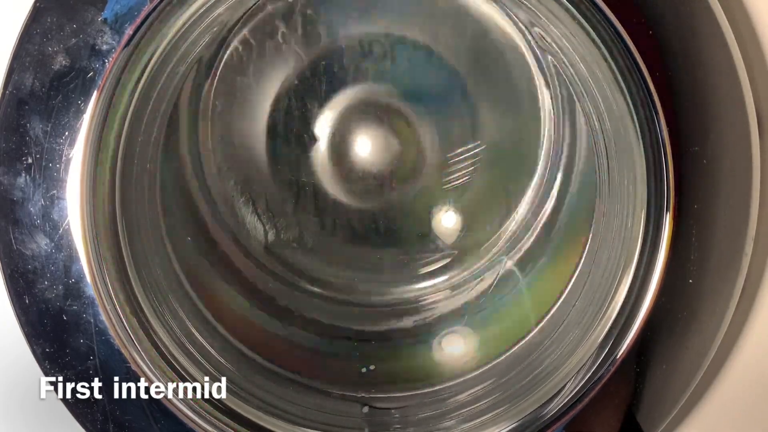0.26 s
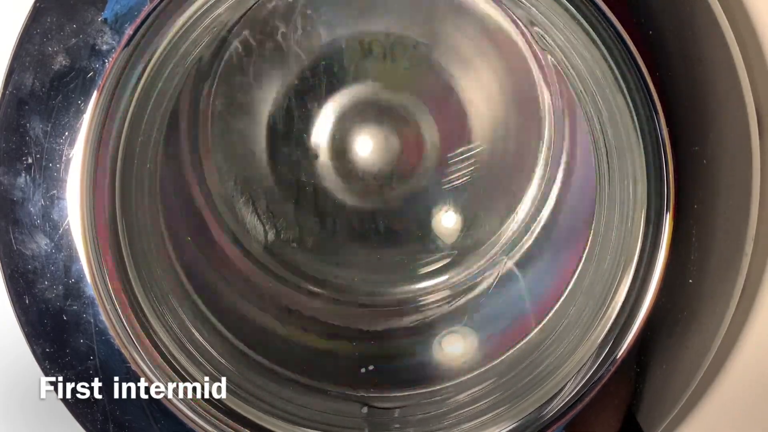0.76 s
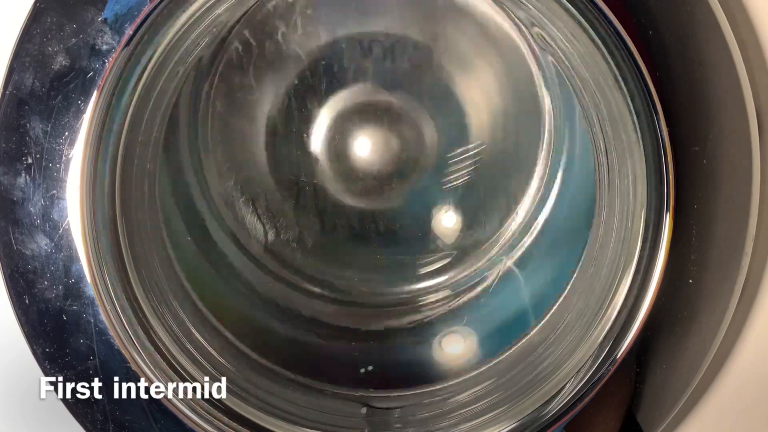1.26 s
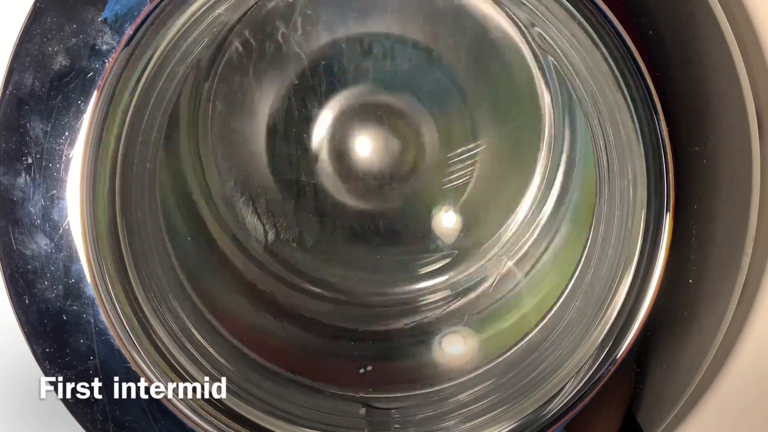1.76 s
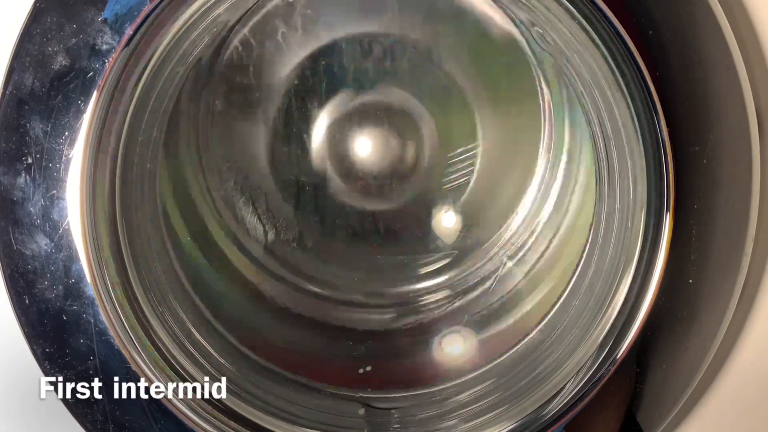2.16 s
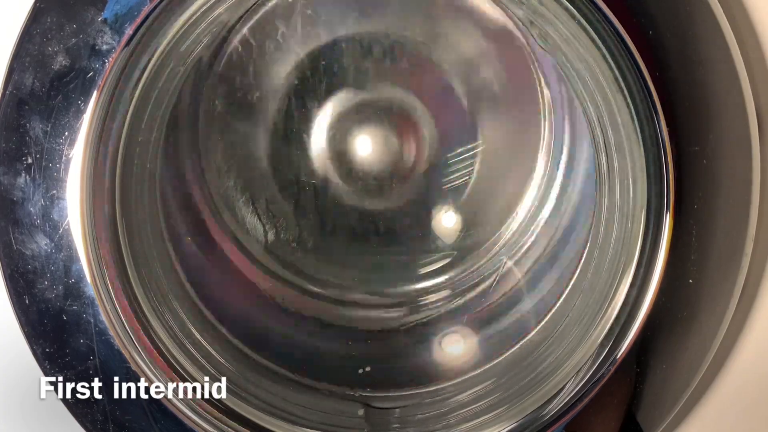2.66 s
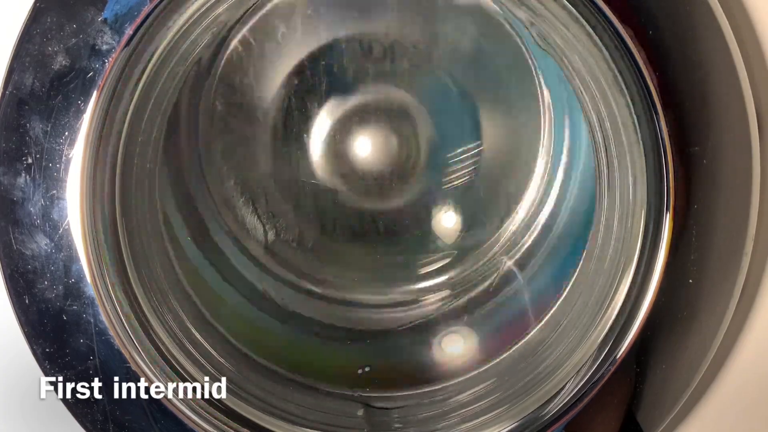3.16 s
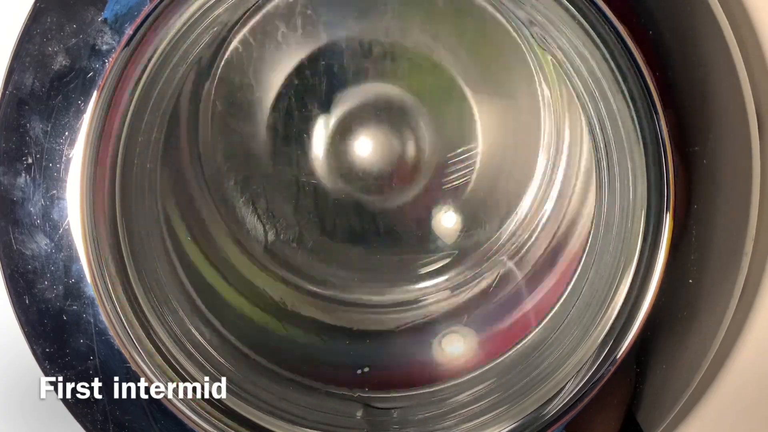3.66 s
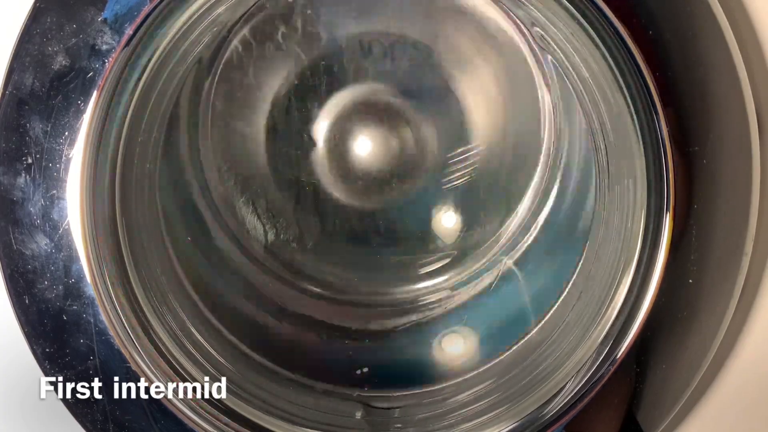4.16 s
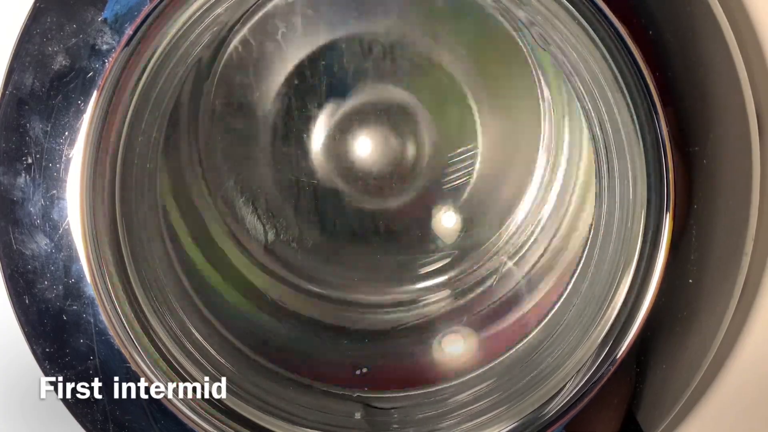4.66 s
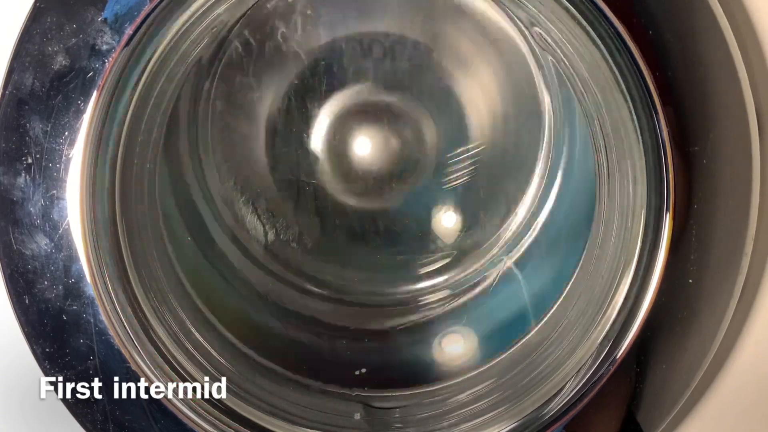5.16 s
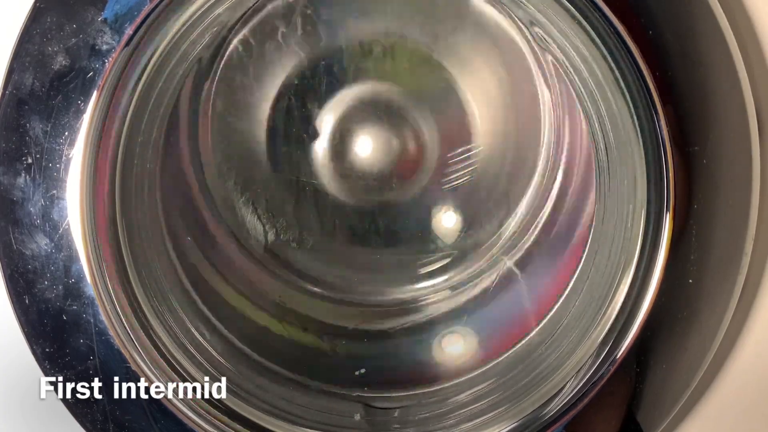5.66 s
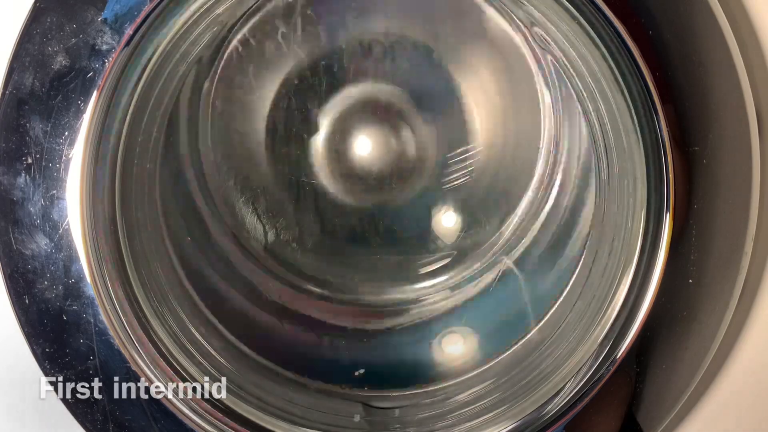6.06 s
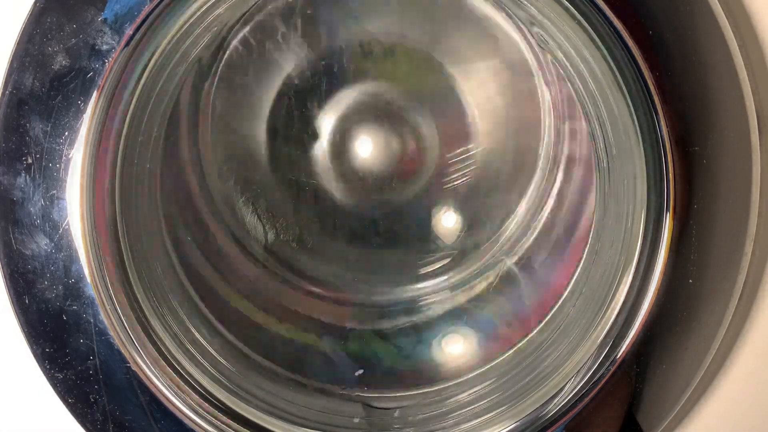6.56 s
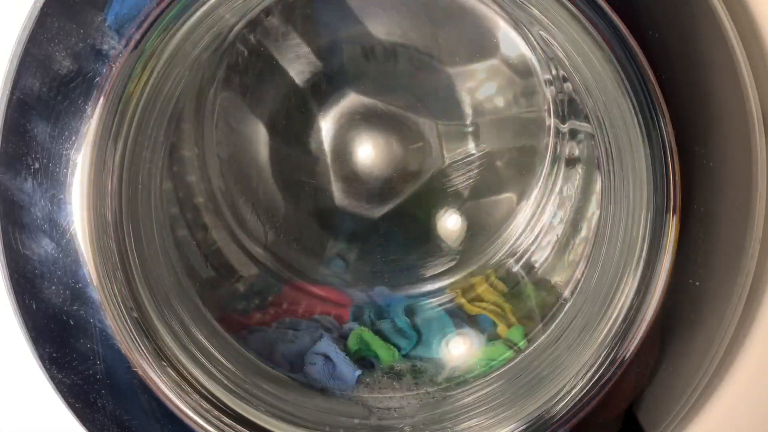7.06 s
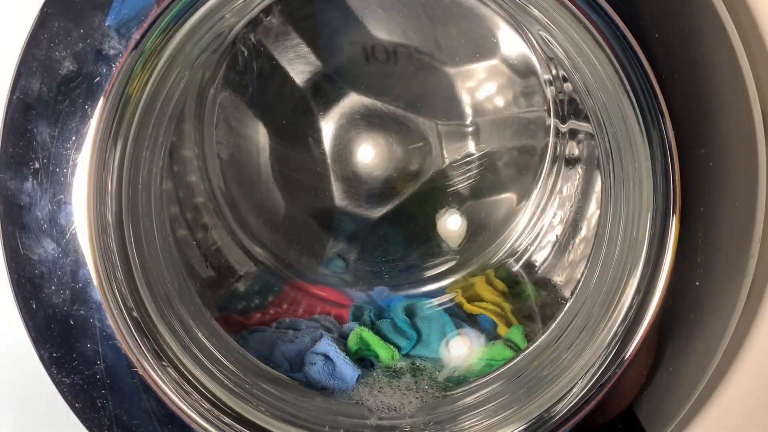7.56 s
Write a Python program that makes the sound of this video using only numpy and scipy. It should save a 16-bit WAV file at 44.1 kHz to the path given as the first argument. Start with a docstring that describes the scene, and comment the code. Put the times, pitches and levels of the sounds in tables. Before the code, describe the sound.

A front-loading washing machine spins, heard from close by. Its motor gives a steady low drone with gently beating tones, a rush of air and steel, and a thin high whine, slowing very slightly as it runs. Near the end the spin fades over about a second into the quiet hum of the standing machine, with a few faint high blips and a tiny puff of hiss.

```python
"""A close, droning rush with a high whine: a front-loading washing machine spins, slowing a little.
A brush motor drives the drum by a belt; shaft, drum, belt and mains tones beat as they cross.
The commutator whines in the casing; air and steel rush underneath. The spin fades into the quiet
hum of the standing machine. Faint blips of a 3.1 kHz tone and a puff of hiss are heard at the end."""
import sys
import numpy as np
from scipy import signal
from scipy.fft import rfft, irfft, next_fast_len
from scipy.io import wavfile
from scipy.ndimage import uniform_filter1d, map_coordinates

SR = 44100
rng = np.random.default_rng(int(sys.argv[2]) if len(sys.argv) > 2 else 0)


def wav_out(sig):
    """Save sig, one row per channel (or a flat mono array), as 16-bit PCM at SR to the path in sys.argv[1]."""
    wavfile.write(sys.argv[1], SR, np.round(np.clip(np.atleast_2d(sig).T, -1, 1) * 32767).astype(np.int16))


N = 343980
TIME_S = np.arange(N) / SR
GRID_POINTS = 1500


def amp(db):
    return np.exp(np.asarray(db) * (np.log(10) / 20))


def unit(x):
    return x / np.sqrt(np.mean(x ** 2) + 1e-20)


def curve(rows):
    """Per-sample values from (time_s, value) rows."""
    return np.interp(TIME_S, *np.transpose(rows))


def stretch(values):
    """Linear interpolation to N samples."""
    return np.interp(np.arange(N), np.linspace(0, N, len(values)), values)


def drift(rate_hz):
    """Smooth random curve on the coarse grid."""
    span = N * rate_hz / SR
    return map_coordinates(rng.standard_normal(int(span) + 4), [np.linspace(0, span, GRID_POINTS)])


def wobble(rate_hz):
    return stretch(drift(rate_hz))


def filtered(x, response):
    size = next_fast_len(N + SR // 2)
    return irfft(rfft(x, size) * response(np.fft.rfftfreq(size, 1 / SR)), size)[:N]


def resonance(hz, centre_hz, width_hz):
    """One mode, gain 1 at its centre."""
    return 1j * hz * width_hz / (centre_hz ** 2 - hz * hz + 1j * hz * width_hz)


def noise(spectrum, patchy_db):
    """Coloured noise, rms 1, with gain patches in time and frequency."""
    bins = signal.stft(rng.standard_normal(N), nperseg=512)[2]
    patches = uniform_filter1d(rng.standard_normal(bins.shape), size=6, axis=0)
    patches = uniform_filter1d(patches, size=14, axis=1)
    white = signal.istft(bins * amp(patchy_db * unit(patches)), nperseg=512)[1][:N]
    freq_hz, db = np.transpose(spectrum)
    colour = lambda hz: amp(np.interp(np.log(hz + 1), np.log(freq_hz + 1), db, left=-120, right=-120))
    return unit(filtered(white, colour))


def tone(turns, rms_db=0):
    """Sine, one cycle per turn, random phase."""
    return np.sqrt(2) * amp(rms_db) * np.sin(2 * np.pi * (turns + rng.random()))


def orders(rows, turns):
    """Whole multiples of a rotation: one turn's waveform, looped."""
    phase = np.linspace(0, 1, 8193)
    return np.interp(turns % 1, phase, sum(tone(order * phase, db) for order, db in rows))


def ramped_orders(rows, turns, waver_db):
    """Multiples of a rotation, each drifting from its start to its end level."""
    total = np.zeros(N)
    for order, start_db, end_db in rows:
        level_db = np.linspace(start_db, end_db, GRID_POINTS) + waver_db * drift(3)
        total += stretch(amp(level_db)) * tone(order * turns)
    return total


def through_modes(rows, modes, turns):
    """Shaft orders swell and dip as they glide across a steel part's modes."""
    def response(hz):
        return sum((-1) ** k * amp(gain_db) * resonance(hz, centre_hz, width_hz)
                   for k, (centre_hz, width_hz, gain_db) in enumerate(modes))
    return filtered(orders(rows, turns), response)


def room(x, t60_s, wet_db):
    """Reflections interfere with the direct sound; gliding tones swell and dip."""
    delay_s = TIME_S[:SR // 2]
    tail = rng.standard_normal(len(delay_s)) * amp(-60 * delay_s / t60_s)
    wet = signal.fftconvolve(x, tail / np.linalg.norm(tail))[:N]
    return (x + amp(wet_db) * wet) / np.sqrt(1 + amp(2 * wet_db))


def shaft_turns():
    """Cumulative motor turns; the heavy drum smooths the speed."""
    speed = [(0, 182.28), (.4, 183.31), (.8, 184.02), (1.2, 184.44), (1.7, 184.63), (2.3, 184.41),
             (2.9, 183.81), (3.6, 182.72), (4.4, 181.12), (5.6, 178.47), (6.6, 176.38), (7.8, 174.2)]  # motor shaft: time_s, speed_hz
    return np.cumsum(uniform_filter1d(curve(speed), size=SR // 3, mode="nearest")) / SR


def motor_whine(turns):
    """Rotor slots ring the stator, commutator bars the casing, brushes their holder."""
    # excitation: order, level_db
    slots = [(18, -56.7)]
    bars = [(32, -62.0), (33, -69.6), (34, -61.1), (35, -48.9), (36, -53.3), (37, -54.6), (38, -62.3),
            (39, -62.0), (40, -63.3)]
    brushes = [(67, -82.4), (68, -80.1), (69, -80.5), (70, -86.6), (71, -79.8)]
    # modes: centre_hz, width_hz, gain_db
    stator = [(3159, 12, -5.7), (3232, 92, -1.8), (3246, 14, 6.3), (3284, 34, 0.5), (3306, 12, 1.5),
              (3323, 12, -0.8)]
    casing = [(5685, 199, -8.1), (5826, 43, -2.1), (5899, 35, 1.0), (5997, 32, 5.1), (6028, 14, 9.9),
              (6054, 27, 7.8), (6111, 16, 7.8), (6172, 21, 4.5), (6209, 111, 1.4), (6269, 12, -7.2),
              (6304, 14, 4.5), (6307, 131, 1.6), (6351, 14, 4.7), (6401, 12, -4.6), (6463, 12, -4.9),
              (6542, 36, -4.1), (6563, 12, 1.0), (6605, 12, -1.2), (6626, 12, -0.6), (6691, 12, -2.2),
              (6721, 12, 1.2), (6806, 100, -3.1), (6806, 15, 3.6), (6830, 25, -2.4), (6974, 12, -6.6),
              (7001, 12, 0.7), (7075, 84, -2.5), (7182, 35, 0.1), (7254, 12, -1.4), (7345, 111, -4.1)]
    holder = [(12160, 19, -8.0), (12354, 14, -7.6), (12450, 68, 11.8), (12461, 91, 12.3), (12534, 12, 7.0),
              (12705, 109, 0.3), (12727, 20, 3.4), (12909, 199, -14.0)]
    bar_swell = [(0, -1), (.3, -0.5), (2.7, 0), (3.5, 0.5), (4.3, 0.5), (4.9, -1.5), (5.4, 1.5), (6, -0.5),
                 (6.8, 0), (7.3, 0), (7.45, -1)]  # commutator whine: time_s, gain_db
    whine = through_modes(slots, stator, turns)
    whine += amp(curve(bar_swell)) * through_modes(bars, casing, turns)
    whine += through_modes(brushes, holder, turns)
    return whine, slots + bars + brushes


def rotor(turns):
    """Once-a-turn unbalance shake, shaft overtones and motor whine."""
    unbalance = [(0, -28), (3.5, -27.5), (5, -28.5), (6.4, -32.5), (7.8, -33.5)]  # shake: time_s, level_db
    # faint overtone envelope, prominent overtones: order, level_db
    envelope = [(10, -74.5), (30, -78), (43, -75), (48, -78.5), (50, -90.5), (64, -93.5), (73, -89),
                (82, -94.5)]
    strong = [(14, -67.5), (25, -71.5), (28, -71.5), (53, -85), (61, -87), (66, -92.5)]
    whine, whine_orders = motor_whine(turns)
    taken = dict(whine_orders + strong)
    scatter_db = 2
    faint = [(order, np.interp(order, *np.transpose(envelope)) + scatter_db * rng.standard_normal())
             for order in range(10, 83) if order not in taken]
    overtones = room(orders(faint + strong, turns), t60_s=.2, wet_db=0)
    shake = tone(turns, curve(unbalance))
    return shake + amp(1.2) * overtones + amp(.8) * room(whine, t60_s=.3, wet_db=-15)


def drum(turns):
    """The uneven load and three lifters shake the cabinet at drum orders, the lifters at multiples of 3; a
    second set holds further lifter tones from order 15 up, with a common level rule."""
    drum_tones = [(3, -48, -57), (4, -46, -57), (5, -42, -41), (6, -47.5, -49), (7, -47, -46), (9, -44, -44),
                  (12, -52, -54), (14, -53, -61), (46, -61, -57), (51, -56, -58)]  # drum tones (6 and 12 beat with the hum): order, start_db, end_db
    pulley_ratio, lifter_db, tilt_db_per_octave = .09394, -56.5, -3
    lifters = []
    for order in range(15, 40, 3):
        level_db = lifter_db + tilt_db_per_octave * np.log2(order / 15)
        lifters.append((order, level_db, level_db))
    return ramped_orders(drum_tones + lifters, pulley_ratio * turns, waver_db=0)


def belt_drive(turns):
    """Low shaft overtones; belt and bearings at fractional orders."""
    tones = [(2, -55, -50), (3, -56, -55), (4, -59, -53), (5, -63, -58), (6, -57, -68), (7, -55, -54),
             (8, -56, -55), (9, -60, -57), (.418, -52, -52), (1.254, -52, -59), (4.246, -54, -56),
             (4.75, -68, -56), (5.137, -55, -68), (8.207, -61, -61), (8.875, -64, -64), (10.059, -67, -67),
             (10.797, -70, -70), (13.906, -69, -69)]  # drive tones: order, start_db, end_db
    return ramped_orders(tones, turns, waver_db=2.5)


def mains_hum():
    """Magnetic pull at twice the mains frequency, with overtones."""
    harmonics = [(1, -31, -31.5), (2, -41.5, -38), (3, -53, -47), (4, -53, -45), (5, -63, -61),
                 (6, -51, -49), (7, -65, -59), (8, -61, -57), (10, -61, -62)]  # hum: order, start_db, end_db
    hum_hz = 99.93
    return ramped_orders(harmonics, hum_hz * TIME_S, waver_db=.4)


def rush(turns):
    """Cabinet rumble, air and steel rush, brush fizz pulsing once a turn; near walls add colour."""
    # noise spectra: freq_hz, density_db
    cabinet = [(30, -36), (42, -29), (52, -13), (70, -1), (100, -3), (185, 0), (215, -6), (270, -6),
               (400, -30)]
    air_and_steel = [(180, -35), (290, -5), (380, -11.5), (450, -15.5), (600, -11), (900, -9.5),
                     (1080, -14), (1500, -12.5), (1950, -23), (2600, -25), (2950, -27.5), (3300, -27),
                     (5500, -38.5)]
    brushes = [(3500, -8.5), (5500, -6), (6400, 3), (7500, -4.5), (9000, -13.5), (11700, -23.5),
               (12600, -14), (14000, -23), (15000, -31.5), (15700, -39)]
    rumble = amp(-41) * noise(cabinet, patchy_db=.5)
    body = amp(-39.5 + .14 * wobble(1.2)) * noise(air_and_steel, patchy_db=.66)
    fizz = amp(-59) * noise(brushes, patchy_db=.7) * (1 + .15 * np.cos(2 * np.pi * turns))
    return rumble + room(body + fizz, t60_s=.15, wet_db=-14)


def panels():
    """Narrow rings that flicker as loose panels rattle."""
    modes = [(3117, 40, -65.5), (3160, 100, -63.5), (2570, 74, -66), (4520, 83, -77), (1379, 78, -55)]  # panel modes: centre_hz, width_hz, level_db
    total = np.zeros(N)
    for centre_hz, width_hz, level_db in modes:
        flicker = amp(level_db + 3.1 * wobble(12))
        ring = filtered(rng.standard_normal(N), lambda hz: resonance(hz, centre_hz, width_hz) ** 2)
        total += flicker * unit(ring)
    return total


def standing_machine():
    """Soft slosh and hum at rest, as coloured noise."""
    spectrum = [(18, -36), (30, -4.5), (150, -1), (437, -11), (538, -7.5), (905, -3.5), (1480, -14.5),
                (1920, -32.5), (3070, -32), (11600, -38.5), (15700, -38.5)]  # idle noise: freq_hz, density_db
    return amp(-60 + .54 * wobble(6)) * noise(spectrum, patchy_db=2)


def burst(centre_s, level_db, half_width_s):
    return amp(level_db) * np.exp(-((TIME_S - centre_s) / half_width_s) ** 2)


def tone_blips():
    """Faint blips of a 3.1 kHz tone as the spin fades."""
    blips = [(7.12, -72, .015), (7.285, -69, .025), (7.39, -76, .015), (7.487, -81, .008),
             (7.535, -83, .012), (7.575, -84, .02), (7.665, -84, .01)]  # blips: centre_s, level_db, half_width_s
    pitch_hz = 3110
    return sum(burst(*blip) for blip in blips) * tone(pitch_hz * TIME_S + .3 * wobble(40))


def puff():
    """One soft hiss after the spin."""
    spectrum = [(4500, -20), (6000, 0), (7000, 0), (7800, -8), (8400, 0), (9500, -20)]  # hiss: freq_hz, density_db
    return burst(centre_s=7.467, level_db=-74, half_width_s=.028) * noise(spectrum, patchy_db=1)


def scene():
    """The spin crossfades into the standing machine."""
    fade_start_s, fade_end_s, ease_s = 6.36, 7.415, .04
    turns = shaft_turns()
    spin = rotor(turns) + drum(turns) + belt_drive(turns) + mains_hum() + rush(turns) + panels()
    ramp = curve([(fade_start_s, 0), (fade_end_s, 1)])
    fade = uniform_filter1d(ramp, size=int(ease_s * SR), mode="nearest")
    return ((1 - fade) * spin + fade * standing_machine() + tone_blips() + puff())[None]


def record(dry):
    """Click-free start, brick-wall low-pass."""
    fade_in_s, cutoff_hz = .002, 15633
    onset = np.minimum(TIME_S / fade_in_s, 1)
    return filtered(onset * dry[0], lambda hz: hz < cutoff_hz)[None]


dry = scene()
out = record(dry)
wav_out(out)
```